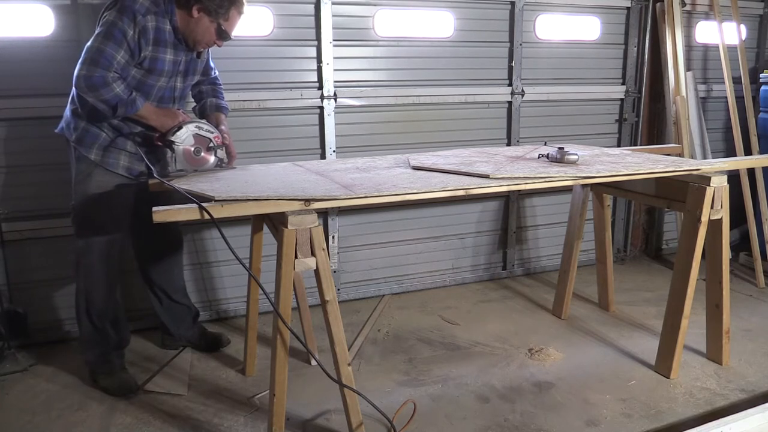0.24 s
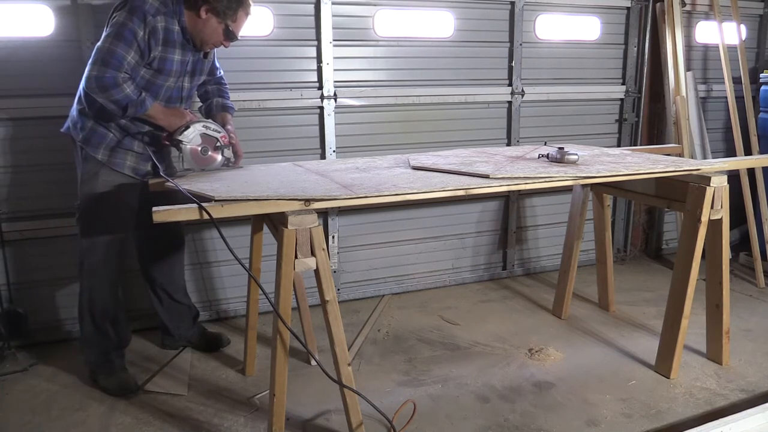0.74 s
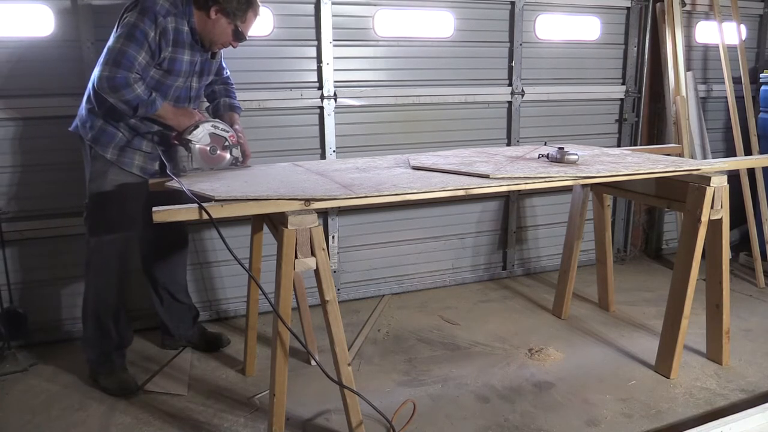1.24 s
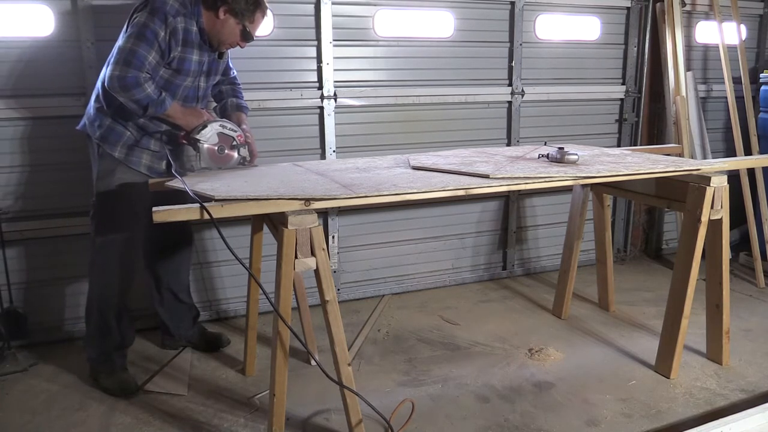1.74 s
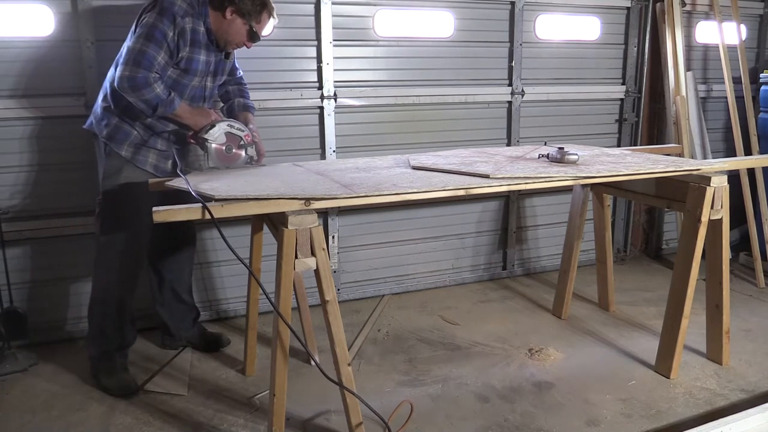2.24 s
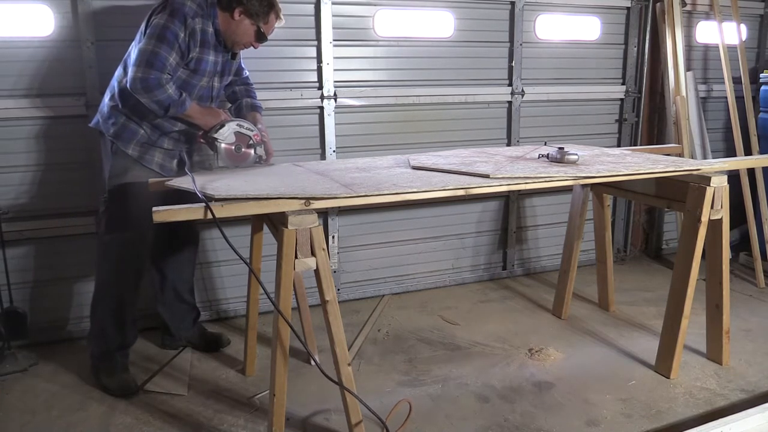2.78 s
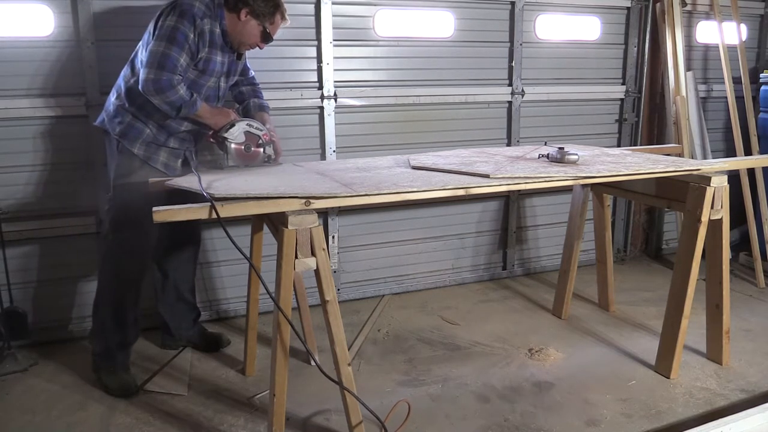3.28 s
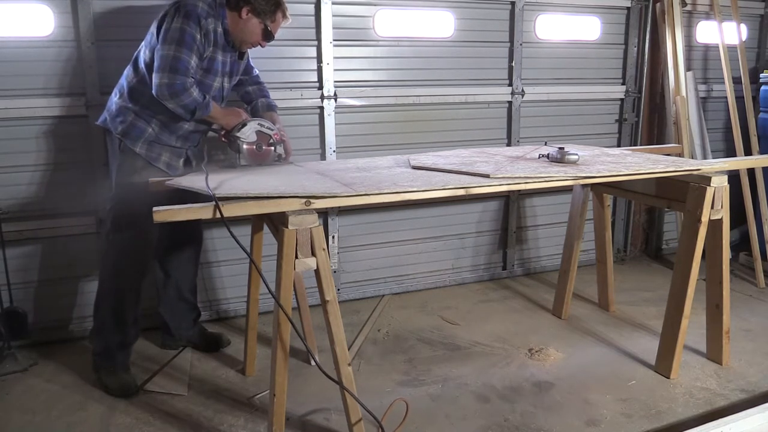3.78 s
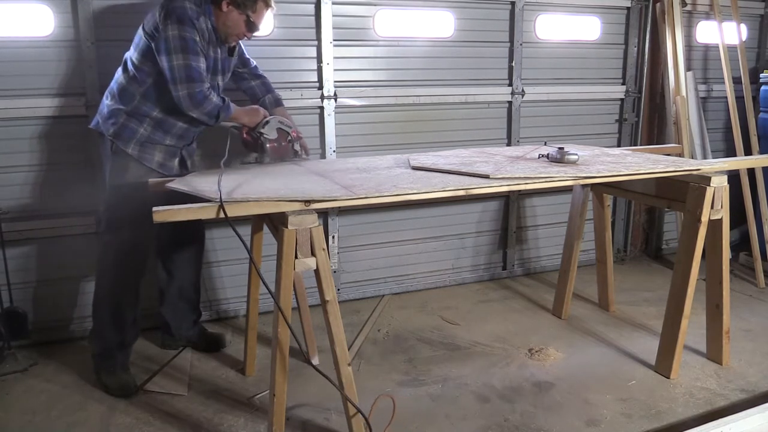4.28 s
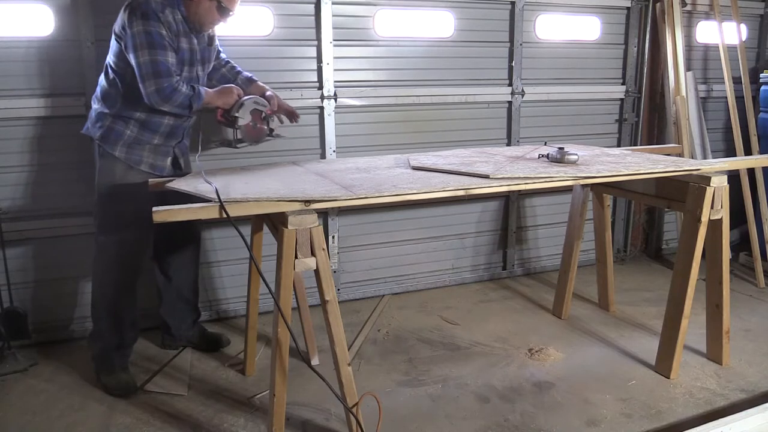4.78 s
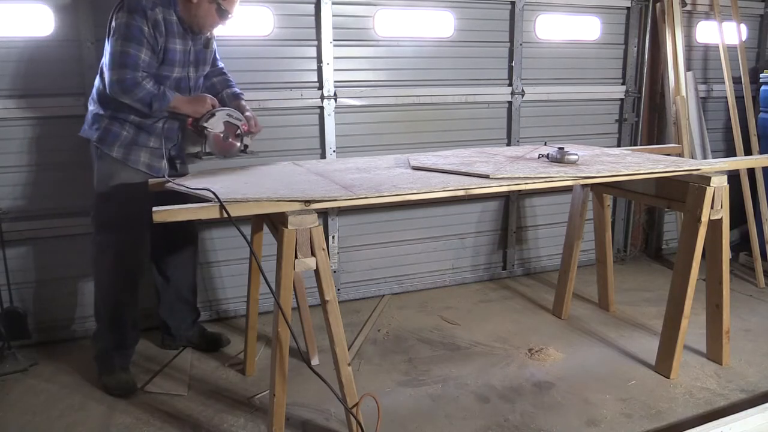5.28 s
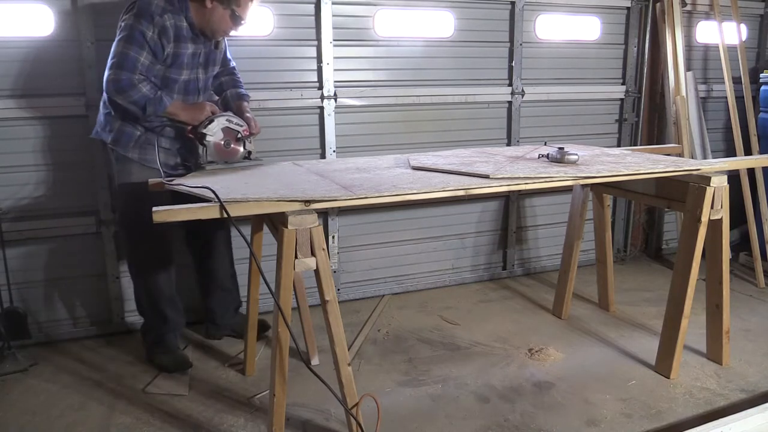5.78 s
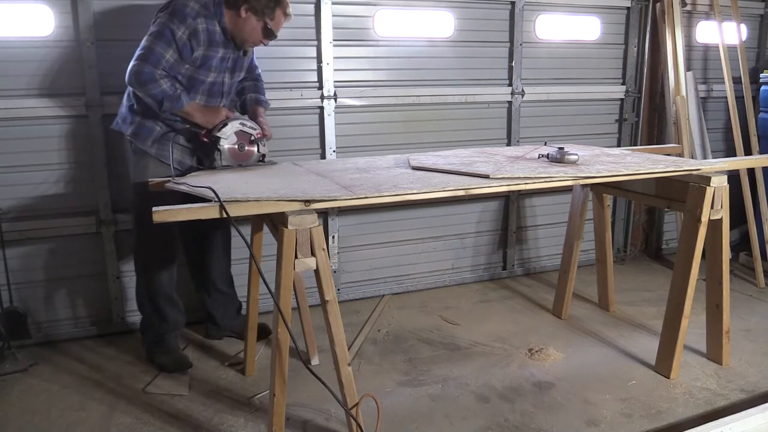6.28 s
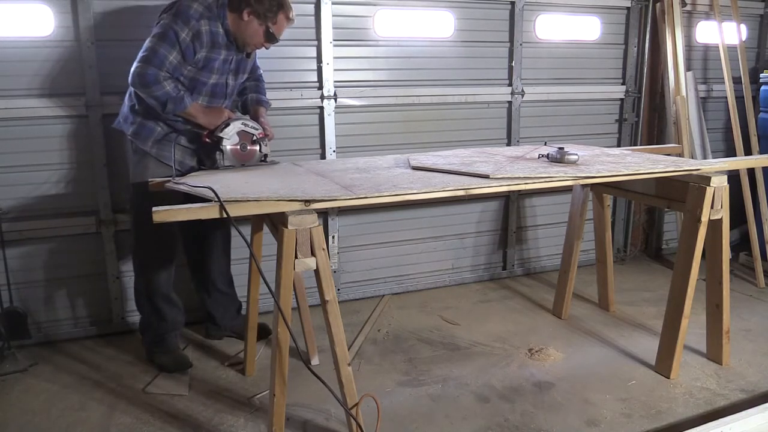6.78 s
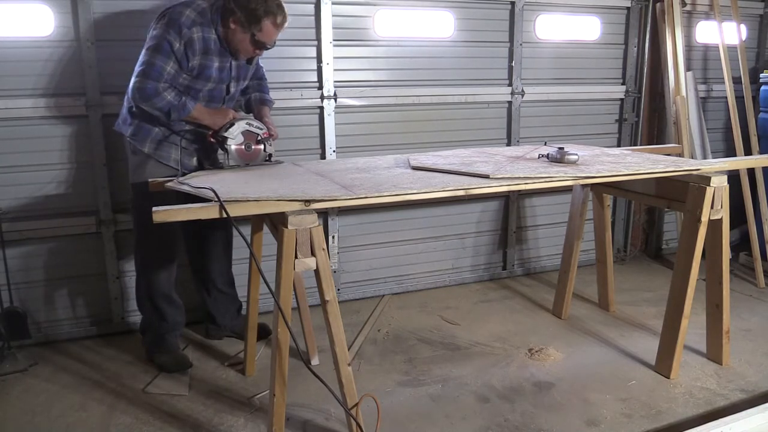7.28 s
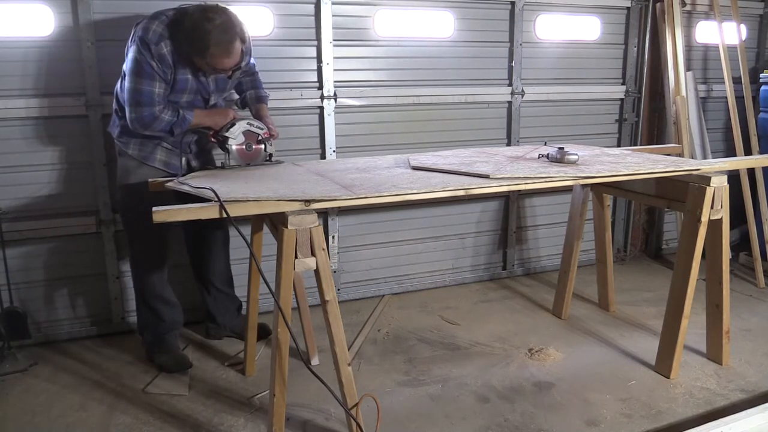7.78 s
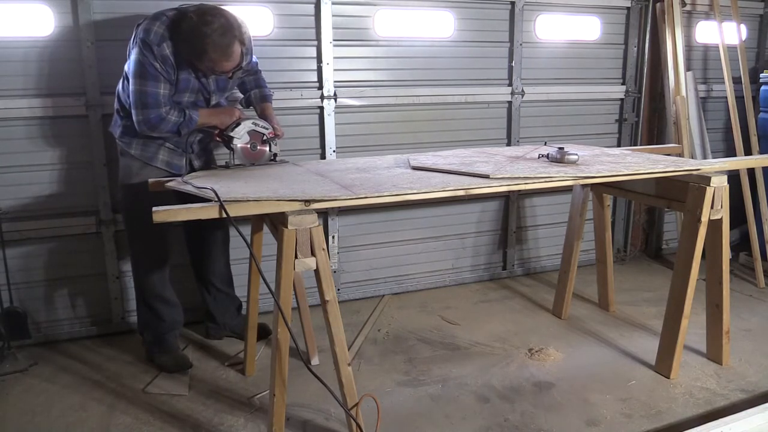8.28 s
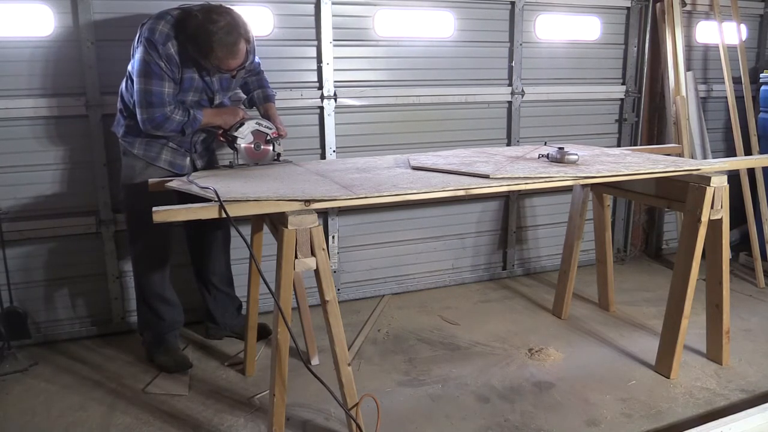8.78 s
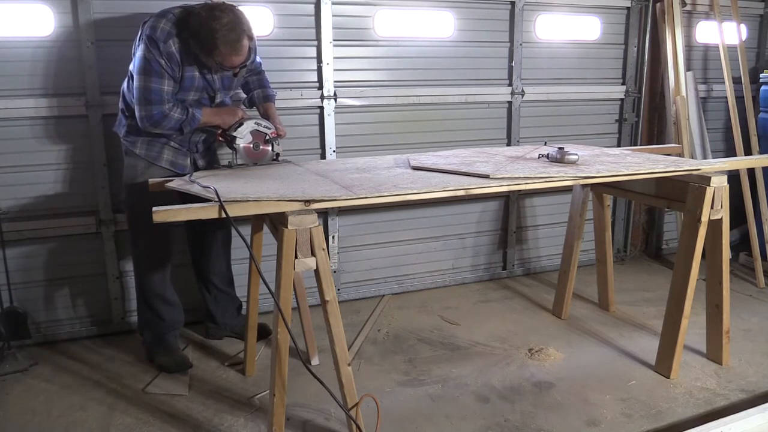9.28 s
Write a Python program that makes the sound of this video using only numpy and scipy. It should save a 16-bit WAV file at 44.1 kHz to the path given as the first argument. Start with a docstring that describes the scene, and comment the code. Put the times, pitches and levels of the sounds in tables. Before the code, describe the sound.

In a hard-walled garage, a circular saw rasps loudly through wood, coasts down in a long falling whine, then surges back into the cut.

```python
"""Circular saw in a garage

A corded circular saw cuts a wooden panel on trestles, coasts down in the air, brushes the wood twice and restarts.
A fast armature gives whining tones and fan rush and, through a gear, drives a 24-tooth blade.
The tooth force, filtered by resonances, gives the bite, the panel's drum tone and the cry of the loaded blade.
The steel modes ring after each touch; mains buzz, bumps of the base, a guard tick and a garage tail complete it."""
import sys
import numpy as np
from scipy import signal
from scipy.fft import irfft
from scipy.io import wavfile
from scipy.ndimage import map_coordinates

SR = 44100
rng = np.random.default_rng(int(sys.argv[2]) if len(sys.argv) > 2 else 0)


def to_wav(sig):
    """Store sig (one row per channel, or 1-D mono) as 16-bit WAV at the path in sys.argv[1].

    Samples outside -1..1 are clipped; the rate is SR.
    """
    pcm = np.clip(np.atleast_2d(sig), -1, 1) * 32767
    pcm = np.round(pcm).astype(np.int16)
    wavfile.write(sys.argv[1], SR, pcm.T)  # frames by channels


N = 420713

# All levels in dB are relative.
# Reverberation of the garage. Each row: frequency in Hz, decay time T60 in seconds.
GARAGE_DECAY = [(200, 1), (1000, 0.49), (4000, 0.34), (12000, 0.18)]

# Mains buzz under load. Each row: time in seconds, level in dB.
HUM_LEVEL = [(0, -59.5), (2.9, -46), (4.2, -61)]
# Overtones of the buzz in the starting surge. Each row: frequency in Hz, level in dB.
BUZZ_OVERTONES = [(240, -10), (360, -4), (480, -4)]
SURGE_S, SURGE_LOW_DB, SURGE_HIGH_DB, SURGE_FADE_DB_PER_S, IDLE_DB = 0.21, -41, -27, 67, -57

# The saw base bumps the panel. Each row: time in seconds, strength in dB.
BASE_BUMPS = [(5.599, -17.5), (5.849, -16.5), (5.999, -13.5), (8.306, -11), (8.6, -18)]
GUARD_S, GUARD_DB = 4.421, -2  # the blade guard snaps shut
# A thin high hiss. Each row: start in seconds, end in seconds, level in dB.
SQUEALS = [(5.598, 6.03, -29.5), (7.746, 8.082, -31)]
SQUEAL_IN_S, SQUEAL_OUT_DB_PER_S = 0.053, 300

# Armature speed while the first cut loads it. Each row: time in seconds, speed in turns per second.
LOADED_SPEED = [(0, 448.4), (1, 431.5), (1.8, 421.7), (2.3, 417), (3, 415.2), (3.6, 406.5), (3.93, 395),
                (4.2, 396.4)]
OFF_S, ON_S = 4.222, 8.28  # trigger released, pressed again
DRAG_PER_S, FRICTION_TURNS = .1515, 224  # coasting: speed plus this offset dies at the drag rate
LATE_COAST_S, LATE_SLOWING_TURNS_PER_S3 = 7.3, 2.  # late in the coast the speed falls a little faster
FREE_TURNS, SPIN_UP_S = 443, .51  # final free speed in turns per second, time constant of the run-up
BLADE_PER_ARMATURE = 9 / 49
TEETH = 24

# Slot, fan and commutator tones. Each row: multiple of the armature speed, level in dB.
WHINE_TONES = [(1, -22), (6, -19), (12, 0), (16, -19), (24, -14), (32, -26), (36, -16), (48, -22),
               (64, -24)]
# Level of these tones together. Each row: time in seconds, level in dB.
WHINE_LEVEL_BY_TIME = [(0, -18), (2.85, -18), (3.1, -23), (3.9, -30), (4.54, -27), (4.59, -20), (4.85, -24),
                       (5.05, -20), (6.9, -20), (7.6, -25), (8.1, -30), (8.4, -33), (9.2, -30), (9.54, -24)]
# How the housing colours the tones. Each row: frequency in Hz, gain in dB.
HOUSING_RESPONSE = [(140, -10), (170, 0), (195, -12), (320, 2), (3000, 0), (9000, -5), (13500, -22),
                    (17000, -90)]
SLOTS, SLOT_GAIN_DB, SLOT_BELOW_TURNS = 16, 17, 190  # slot tones stand out once the armature is slow
# Fan rush that slides with speed. Each row: multiple of the armature speed, level in dB.
RUSH_BY_MULTIPLE = [(1, -0.5), (4, -10.5), (7, -9.5), (9, -3), (12, -5), (14, -10), (18, -12), (24, -14),
                    (40, -16.5), (100, -18.5)]
# Fixed colour of the fan rush. Each row: frequency in Hz, gain in dB.
RUSH_COLOUR = [(200, -26.5), (1100, 1.5), (1600, -2), (2200, 6), (3000, 3), (9000, -3), (12500, -13),
               (15500, -30)]
# Spectrum of the housing rattle. Each row: frequency in Hz, density in dB per Hz.
RATTLE_SPECTRUM = [(18, -77), (30, -57), (314, -10), (601, 2), (1150, -6), (1300, -2.5), (1800, -4.5),
                   (2340, -16), (3960, -120)]
# Loudness of the motor. Each row: armature turns per second, fan rush in dB, housing rattle in dB.
NOISE_BY_SPEED = [(107.54, -14.5, -31), (127, -16, -23.5), (166, -17.5, -27.5), (200, -15, -24.5),
                  (245, -14, -22.5), (305, -14.5, -23), (376, -18.5, -24.5), (402, -16, -25),
                  (415, -18.5, -24.5), (451, -13, -25.5)]
# Pinion mesh, heard when slow. Each row: multiple of the armature speed, level in dB.
GEAR_MESH = [(9, 0), (18, -1), (27, -4), (36, -12)]
GEAR_DB, GEAR_DB_PER_TURN = -17, .16  # at the slowest speed, and its loss per turn a second
# The gearcase rings as a mesh tone passes. Each row: frequency in Hz, width in Hz, gain in dB.
GEARCASE_MODES = [(1100, 200, 3), (2220, 520, 3.5), (3710, 350, 8.5)]
BIND_S, BIND_WIDTH_S, BIND_DB = 8.255, 0.032, -20  # the slow blade binds in the kerf; motor noise drops

# Modes of the free blade. Each row: frequency in Hz, level in dB.
BLADE_MODES = [(1670, -48), (1723, -50), (1809, -41), (2328, -46), (2525, -48), (2800, -50), (2961, -50),
               (3203, -52), (3634, -55), (4558, -51), (5525, -52)]
RING_FADE_DB_PER_S = 14.5
# One steel mode rings out as the blade leaves the wood. Each row: time in seconds, frequency in Hz, level in dB.
LONE_MODES = [(4.3, 3205, -24), (6.69, 2965, -22), (7.26, 2525, -19)]
RING_OUT_S, RING_OUT_DB_PER_S = .2, 40

# One multiple of the blade's turn sings out as it meets a resonance of panel or blade.
# Each row: centre in seconds, half width in seconds, multiple of the blade speed, level in dB.
SINGING_MULTIPLES = [(.55, .1, 18, -16), (.85, .1, 18, -22), (1.32, .11, 19, -14), (1.7, .2, 20, -24),
                     (2.28, .2, 18, -25), (2.8, .2, 20, -19), (3.15, .12, 19, -24), (3.4, .12, 20, -20),
                     (3.68, .14, 21, -19), (3.55, .15, 26, -28), (4.12, .1, 18, -17), (1, .15, 48, -23),
                     (1.6, .2, 47, -24), (2.33, .15, 46, -22), (2.85, .2, 46, -23), (3.55, .12, 46, -21),
                     (3.57, .12, 48, -19), (4.02, .15, 48, -21)]
# Tooth tone while the blade is deep in the kerf. Each row: time in seconds, level in dB.
TOOTH_TONE_LEVEL = [(0, -36), (.55, -29), (.75, -37), (1, -26), (1.35, -25), (1.6, -30), (2, -35),
                    (2.4, -24), (2.95, -25), (3.2, -18), (3.32, -9), (3.5, -28), (3.8, -27), (4.1, -39),
                    (4.3, -75)]
CHATTER_S, CHATTER_DB, CHATTER_DB_PER_S = 3.93, -16, 110.5  # every second tooth stands out once

# Tooth pattern: low multiples lead, even ones and every fourth stand out.
PATTERN_DB_PER_OCTAVE, PAIRED_DB = -3.3, 2
WOBBLE_DB = 1.4  # a slow blade strikes once a turn
# Spectrum of the bite. Each row: frequency in Hz, density in dB per Hz.
BITE_SPECTRUM = [(120, -104), (200, -21), (430, -19), (974, -13.5), (1480, 1.5), (1650, -4.5), (2900, -5),
                 (3550, -0.5), (10800, -6), (12900, -12), (15500, -34)]
# Resonant peaks of the bite. Each row: frequency in Hz, width in Hz, height in dB above the bite spectrum.
BITE_PEAKS = [(340, 44, 6), (1754, 45, 5), (2710, 45, 5.5), (4570, 94, 6.5), (5580, 280, -4),
              (5800, 61, 10), (6290, 520, 7), (7270, 180, 6.5), (9140, 39, 11), (10440, 59, 7.5),
              (11260, 79, 7.5)]
# Contacts with the wood. Each row: start in seconds, end in seconds, bite in dB, panel tone in Hz,
# panel width in Hz, blade ring in dB.
WOOD_CONTACTS = [(0, 4.24, -13, 1446, 60, 10), (6.54, 6.6, -10, 1342, 70, 23.5),
                 (6.96, 7.16, -9, 1320, 68, 22), (8.12, 10.35, -14.5, 1320, 114, 13)]
BITE_IN_S, LET_GO_DB_PER_S = 0.0095, 170
# Pressure of the feed. Each row: time in seconds, gain on the cutting sound in dB.
FEED_PRESSURE = [(0, -6.5), (.15, -0.5), (.5, -3.5), (.9, 4), (1.2, -0.5), (1.65, -1.5), (2.1, 1.5),
                 (2.4, -0.5), (2.95, 0.5), (3.3, 0), (3.85, -3.5), (3.98, 1.5), (4.14, -1), (4.3, -9.5),
                 (6.55, -2), (6.6, -5.5), (6.72, 10.5), (6.97, -5), (7, -2), (7.03, -4), (7.06, 1.5),
                 (7.13, -1), (7.2, -5), (8.13, -4), (8.19, -6.5), (8.22, 2.5), (8.3, 1.5), (8.42, -2.5),
                 (8.55, -1.5), (8.61, 3), (8.75, -1.5), (9.02, 0), (9.1, 1.5), (9.24, 0), (9.31, -16),
                 (9.42, -1.5), (9.54, -3)]
PANEL_DB, CRY_DB, SWELL_S = -10, -8, 0.16  # resting levels; half width of a swell
# Swells of the panel tone. Each row: centre in seconds, height in dB above rest.
PANEL_TONE_SWELLS = [(.53, 3), (1.3, -3), (2.1, -1.5), (3.29, -2), (4.14, 5), (6.6, 6.5), (8.34, 13)]
PANEL_FREE_S = 8.295  # the stalling blade pins the panel until the motor pulls
# The blade cries out. Each row: centre in seconds, height in dB above rest.
CRY_SWELLS = [(1.18, 3.5), (1.48, 1.5), (2.4, 4), (3.64, 8), (3.98, 5), (4.2, 9), (7.05, 0), (8.12, -7),
              (8.27, 7), (9.04, 3.5), (9.38, 7)]
# The upper mode of the cry. Each row: centre in seconds, height in dB above rest.
HIGH_CRY_SWELLS = [(6.58, 7), (7.05, 2), (8.26, 15.5)]

LEAN_DB = 3.5  # left minus right, ahead of the soft overload
LIMIT_DB, SQUEEZE, SENSE_S, RECOVER_DB_PER_S, START_OVER_DB = -21, 0.86, 0.054, 8, 18
EDGE_HZ = 15650  # upper band limit


def gain_of(db):
    """Amplitude ratio: twenty decibels for each factor of ten."""
    return 10 ** (np.asarray(db) / 20)


def unit_rms(x):
    """Normalisation: division by the root mean square."""
    return x / np.sqrt(np.mean(x ** 2) + 1e-20)


def read_spectrum(points, hz):
    """Spectral interpolation: values are linear along a logarithmic frequency axis."""
    f, value = np.transpose(points)
    return np.interp(np.log(hz + 1e-3), np.log(f + 1e-3), value)


def curve(rows, at):
    """Linear interpolation of every further column of a table over its first."""
    first, *columns = np.transpose(rows)
    return [np.interp(at, first, column) for column in columns]


def shaped(x, gain):
    """Time-varying filtering: the short-time spectrum is multiplied by gain(hz, t)."""
    hz, t, z = signal.stft(x, SR, nperseg=1024, noverlap=768)
    y = signal.istft(z * gain(hz[:, None], t), SR, nperseg=1024, noverlap=768)[1]
    return y[..., :x.shape[-1]]


def resonate(x, hz, width):
    """Resonance by heterodyne: the band at hz is shifted to zero, smoothed and shifted back."""
    carrier = np.exp(2j * np.pi * np.cumsum(hz * np.ones(len(x))) / SR)
    pole = np.exp(-np.pi * width / SR)
    baseband = signal.lfilter([1 - pole], [1, -pole], x / carrier + 1e-18)
    return 2 * (carrier * baseband).real


def wander(per_s):
    """Slow random fluctuation of rms 1: sparse random knots, band-limited between them."""
    knots = rng.standard_normal(int(N / SR * per_s) + 2)
    return unit_rms(signal.resample(knots, N))


def held(start, end, rise_s, fall_db_per_s):
    """Envelope: linear rise, hold, exponential decay; a start at zero is already risen."""
    t = np.arange(N) / SR
    rise = np.clip((t - start) / rise_s + (start == 0), 0, 1)
    return rise * gain_of(-fall_db_per_s * np.maximum(t - end, 0))


def swells(rows):
    """Gaussian bumps on a decibel scale."""
    t = np.arange(N) / SR
    return sum(db * np.exp(-((t - s) / SWELL_S) ** 2) for s, db in rows)


def garage(x):
    """Diffuse reverberation: sparse taps of random sign decay by band; weak bass keeps both sides alike there."""
    taps = np.zeros((2, SR))
    at = np.arange(300, SR - 20, 20) + rng.integers(0, 20, (2, (SR - 301) // 20))
    np.put_along_axis(taps, at, rng.choice([-1., 1.], at.shape), 1)

    def decay(hz, t):
        return gain_of(-60 * t / read_spectrum(GARAGE_DECAY, hz)) * np.clip(hz / 1500, .2, 1)
    tail = shaped(taps, decay)
    lead = x[:SR // 2][::-1]  # the room is already full of sound at the start
    wet = signal.fftconvolve(np.r_[lead, x][None], tail / np.linalg.norm(tail[0]), axes=1)
    return wet[:, len(lead):len(lead) + N]


def buzz():
    """Magnetic pull at twice the mains frequency, unsteady as the brushes spark, surging at the restart."""
    t = np.arange(N) / SR
    surge = held(ON_S, ON_S + SURGE_S, 0.036, SURGE_FADE_DB_PER_S)
    running = gain_of(curve(HUM_LEVEL, t)[0]) * held(0, OFF_S, 1, 301) + gain_of(IDLE_DB) * (t > ON_S)
    high = sum(gain_of(db + 4.5 * wander(45)) * np.sin(2 * np.pi * hz * t) for hz, db in BUZZ_OVERTONES)
    low_level = (running + gain_of(SURGE_LOW_DB) * surge) * gain_of(1.5 * wander(22))
    low = low_level * np.sin(2 * np.pi * 120 * t)
    return np.sqrt(2) * (low + gain_of(SURGE_HIGH_DB) * surge * high)


def knocks():
    """Damped impact: soft dull bumps of low resonant noise, rising fast and decaying exponentially."""
    t, shape = np.arange(SR // 2) / SR, np.zeros(N)
    for s, db in BASE_BUMPS:
        shape[round(s * SR)] = gain_of(db - 12.0)
    shape = signal.oaconvolve(shape, (1 - np.exp(-t / 0.0043)) * np.exp(-t / 0.046))[:N]
    noise = rng.standard_normal(N)
    return shape * unit_rms(resonate(noise, 137, 34) + resonate(noise, 270, 180))


def guard():
    """Impact of the guard: two high modes decay together as one short bright tick."""
    t, out = np.arange(800) / SR, np.zeros(N)
    tick = np.exp(-t / .0012) * (np.sin(2 * np.pi * 4700 * t) + np.sin(2 * np.pi * 2800 * t))
    out[round(GUARD_S * SR):][:len(t)] = gain_of(GUARD_DB) * tick
    return out


def squeal():
    """Narrow-band noise: two equal resonances in series leave a brief thin hiss high up."""
    noise = rng.standard_normal(N)
    hiss = unit_rms(resonate(resonate(noise, 9400, 1200), 9400, 1200))
    level = sum(gain_of(db) * held(start, end, SQUEAL_IN_S, SQUEAL_OUT_DB_PER_S)
                for start, end, db in SQUEALS)
    return level * hiss


def spin():
    """Rotational dynamics: armature speed sags under load, coasts down by drag and friction, runs up again."""
    t = np.arange(N) / SR
    coast_s = np.minimum(t, ON_S) - OFF_S
    coast = (LOADED_SPEED[-1][1] + FRICTION_TURNS) * np.exp(-DRAG_PER_S * coast_s) - FRICTION_TURNS
    coast = coast - LATE_SLOWING_TURNS_PER_S3 * np.clip(t - LATE_COAST_S, 0, ON_S - LATE_COAST_S) ** 2
    run_up = FREE_TURNS + (coast - FREE_TURNS) * np.exp(-np.maximum(t - ON_S, 0) / SPIN_UP_S)
    return np.where(t < OFF_S, curve(LOADED_SPEED, t)[0], run_up)


def motor(speed):
    """Harmonics of rotation: slot, fan, commutator and gear tones, a fan rush that scales with speed, a rattle."""
    t, turns = np.arange(N) / SR, np.cumsum(speed) / SR
    slow = np.clip((SLOT_BELOW_TURNS - speed) / 60, 0, 1)

    def whine_tone(k, db):
        slot_db = SLOT_GAIN_DB * slow * (k % SLOTS == 0)
        level_db = db + slot_db + read_spectrum(HOUSING_RESPONSE, k * speed)
        level_db = level_db + 1.25 * wander(7.) + 2.9 * wander(30)
        return gain_of(level_db) * np.sqrt(2) * np.sin(2 * np.pi * k * turns)
    tones = sum(whine_tone(k, db) for k, db in WHINE_TONES)

    # the phase of the mesh jitters
    mesh = sum(gain_of(db + 3. * wander(25)) * np.sin(2 * np.pi * k * turns + 2.2 * wander(150))
               for k, db in GEAR_MESH)
    mesh = sum(gain_of(db) * resonate(resonate(mesh, hz, width), hz, width)
               for hz, width, db in GEARCASE_MODES)
    gear = gain_of(GEAR_DB - GEAR_DB_PER_TURN * (speed - speed.min())) * mesh

    def fan(hz, at):
        multiple = hz / np.interp(at, t, speed)
        gain = gain_of(read_spectrum(RUSH_BY_MULTIPLE, multiple) + read_spectrum(RUSH_COLOUR, hz))
        return gain / np.sqrt(np.mean(gain ** 2, axis=0))
    rush_db, rattle_db = curve(NOISE_BY_SPEED, speed)
    rush = gain_of(rush_db + 1.0 * wander(20)) * shaped(rng.standard_normal(N), fan)
    rattle = shaped(rng.standard_normal(N), lambda hz, at: gain_of(read_spectrum(RATTLE_SPECTRUM, hz)))
    noise = gear + rush + gain_of(rattle_db) * unit_rms(rattle)

    bind = gain_of(BIND_DB * np.exp(-((t - BIND_S) / BIND_WIDTH_S) ** 2))
    return bind * gain_of(curve(WHINE_LEVEL_BY_TIME, t)[0]) * tones, bind * noise


def blade_ring():
    """Free vibration: lightly damped steel modes are set off by each touch and waver one by one."""
    t = np.arange(N) / SR
    modes = sum(gain_of(db + 2. * wander(2)) * np.sqrt(2) * np.sin(2 * np.pi * hz * t + .7 * wander(14))
                for hz, db in BLADE_MODES)
    levels = [gain_of(row[-1]) * held(row[0], row[1], 0.17, RING_FADE_DB_PER_S) for row in WOOD_CONTACTS]

    def lone_mode(s, hz, db):
        level = gain_of(db) * held(s, s + RING_OUT_S, 0.074, RING_OUT_DB_PER_S) * gain_of(2. * wander(12))
        return level * np.sin(2 * np.pi * hz * t + .5 * wander(14))
    lone = sum(lone_mode(s, hz, db) for s, hz, db in LONE_MODES)
    return np.max(levels, axis=0) * modes + np.sqrt(2) * lone


def blade_tones(speed):
    """Forced resonance: clean multiples of the blade's turn swell and fade as each meets a mode."""
    t, out = np.arange(N) / SR, np.zeros(N)
    turns = np.cumsum(speed * BLADE_PER_ARMATURE) / SR
    for s, half_s, k, db in SINGING_MULTIPLES:
        near = slice(max(round((s - 3 * half_s) * SR), 0), round((s + 3 * half_s) * SR))
        level = gain_of(db) * np.exp(-((t[near] - s) / half_s) ** 2)
        out[near] += level * np.sin(2 * np.pi * k * turns[near])
    return out


def tooth_tone(speed):
    """Periodic excitation: clean tones at the tooth rate, at half of it, and at multiples of both."""
    t, passes = np.arange(N) / SR, np.cumsum(speed * BLADE_PER_ARMATURE * TEETH) / SR
    every = sum(gain_of(1.2 * wander(5) - 9 * (k - 1)) * np.sin(2 * np.pi * k * passes) for k in (1, 2, 4))
    second = sum(np.sin(np.pi * k * passes) for k in (1, 3, 4))
    chatter = gain_of(CHATTER_DB - CHATTER_DB_PER_S * abs(t - CHATTER_S))
    return gain_of(curve(TOOTH_TONE_LEVEL, t)[0]) * every + chatter * second


def teeth(speed, change_per_s=4.):
    """Periodic force with noise: uneven teeth repeat a drifting pattern each turn; torn fibres give bursts."""
    stages = 60
    k = np.arange(190)  # multiples of the blade's turn
    shape_db = PATTERN_DB_PER_OCTAVE * np.log2(np.maximum(k, 10) / 30)
    shape_db = shape_db + PAIRED_DB * ((k % 2 == 0) * 1. + (k % 4 == 0))
    phases = np.exp(2j * np.pi * rng.random(190))
    patterns = irfft(gain_of(shape_db + 3. * rng.standard_normal((stages, 190))) * phases, 4096)
    place = np.cumsum(speed * BLADE_PER_ARMATURE) / SR % 1 * 4096  # position within the turn
    stage = np.minimum(np.arange(N) / SR * change_per_s, stages - 1)
    steady = map_coordinates(np.c_[patterns, patterns[:, 0]], [stage, place], order=1)
    # more tearing twice a turn, as the blade wobbles
    burst_db = 1.14 * np.clip(wander(400), -2, 2) + 0.82 * wander(20) + 0.38 * np.cos(np.pi * place / 1024)
    once_a_turn = np.clip(2 - speed / 150, 0, 1) * np.cos(np.pi * place / 2048)
    bursts = gain_of(burst_db + WOBBLE_DB * once_a_turn)
    return unit_rms(steady), unit_rms(bursts * rng.standard_normal(N))


def cutting(speed):
    """Source and filter: tooth force through kerf and guard, the panel's drum tone, the loaded blade's cry."""
    t, flicker_db = np.arange(N) / SR, 2. * wander(30)  # the treble flickers

    def colour(hz, at):
        peaks = sum((gain_of(db) - 1) / (1 + (2 * (hz - f) / w) ** 2) for f, w, db in BITE_PEAKS)
        treble_db = np.interp(at, t, flicker_db) * np.clip(hz / 10000, 0, 1)
        return gain_of(read_spectrum(BITE_SPECTRUM, hz) + treble_db) * (1 + peaks)
    steady, torn = teeth(speed)
    bite = unit_rms(shaped(1.05 * steady + torn, colour))
    force = 0.21 * steady + torn  # drives the panel and the cry
    high_cry = 0.2 * gain_of(swells(HIGH_CRY_SWELLS)) * unit_rms(resonate(force, 3750, 170))
    cry = unit_rms(resonate(force, 3533, 150)) + high_cry
    sound = 1.39 * bite + gain_of(CRY_DB + swells(CRY_SWELLS)) * cry

    panel_free = (t < WOOD_CONTACTS[-1][0]) | (t > PANEL_FREE_S)
    drum_level = gain_of(PANEL_DB + swells(PANEL_TONE_SWELLS)) * panel_free
    out = np.zeros(N)
    for start, end, db, hz, width, ring_db in WOOD_CONTACTS:
        touch = gain_of(db) * held(start, end, BITE_IN_S, LET_GO_DB_PER_S)
        drum = drum_level * unit_rms(resonate(force, hz, width))
        out += touch * (sound + drum)
    return gain_of(curve(FEED_PRESSURE, t)[0]) * out


def scene():
    """Superposition: all sources sit at the saw; clean tones beam at the listener and stir the room less."""
    speed = spin()
    whine, motor_noise = motor(speed)
    tones = whine + tooth_tone(speed) + blade_tones(speed) + blade_ring()
    saw = motor_noise + buzz() + cutting(speed) + squeal() + knocks() + guard()
    return gain_of(0.5) * saw + gain_of(2.) * tones + gain_of(-3) * garage(saw + .4 * tones)


def levelled(x):
    """Gain control: the level ducks quickly under loud sound and recovers slowly."""
    keep = np.exp(-1 / (SENSE_S * SR))
    power = signal.lfilter([1 - keep], [1, -keep], (x ** 2).mean(0))
    power_db = 10 * np.log10(power + 1e-12)
    fall = np.arange(N) * RECOVER_DB_PER_S / SR
    # a running peak that falls at the recovery rate
    peak_db = np.maximum.accumulate(power_db - LIMIT_DB + fall)
    over_db = np.maximum(peak_db, START_OVER_DB) - fall
    return x / gain_of(SQUEEZE * np.maximum(over_db, 0))


def record(dry):
    """Transduction: gain control, a louder left channel, soft overload, a bass cut, then the band limit."""
    sides = levelled(dry) * gain_of([[LEAN_DB / 2], [-LEAN_DB / 2]])
    soft = 0.86 * np.tanh(sides / 0.77)
    thin = signal.sosfilt(signal.butter(2, 110., "highpass", fs=SR, output="sos"), soft)
    band_limit = signal.firwin(511, EDGE_HZ, window=("kaiser", 9), fs=SR)
    return signal.oaconvolve(thin, band_limit[None], "same")


dry = scene()
out = record(dry)
to_wav(out)
```